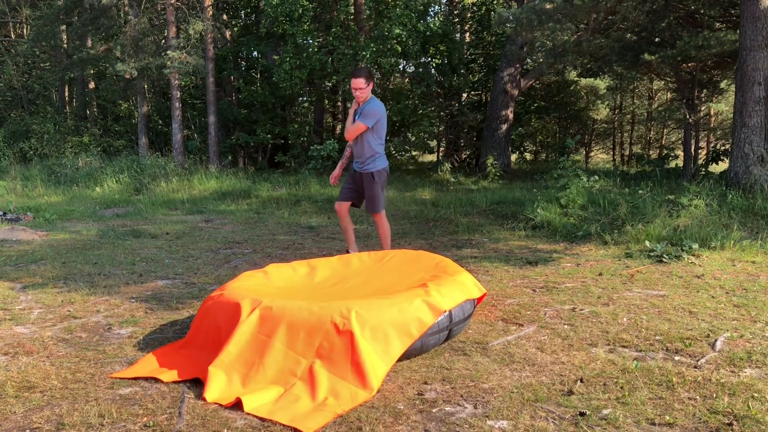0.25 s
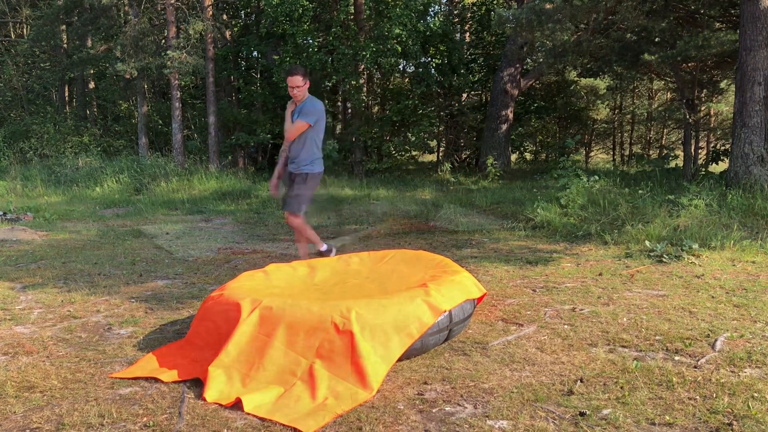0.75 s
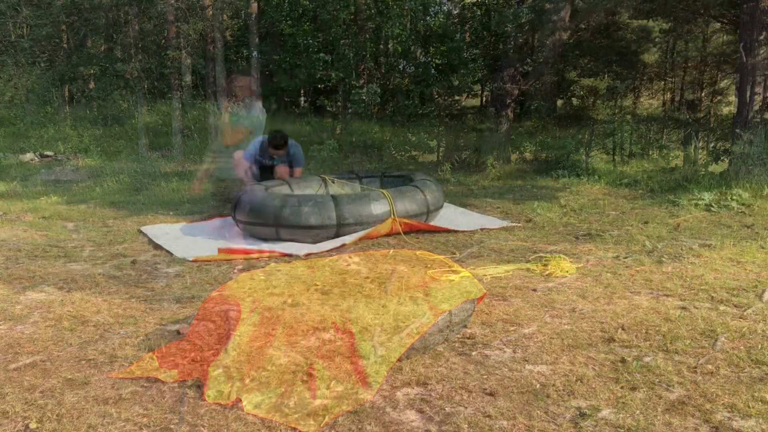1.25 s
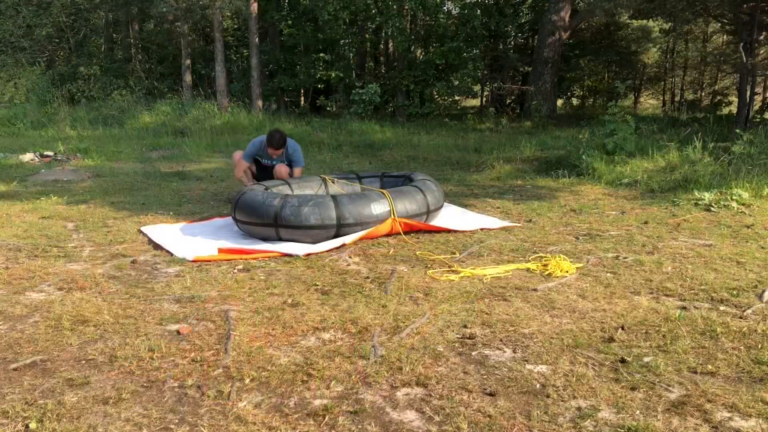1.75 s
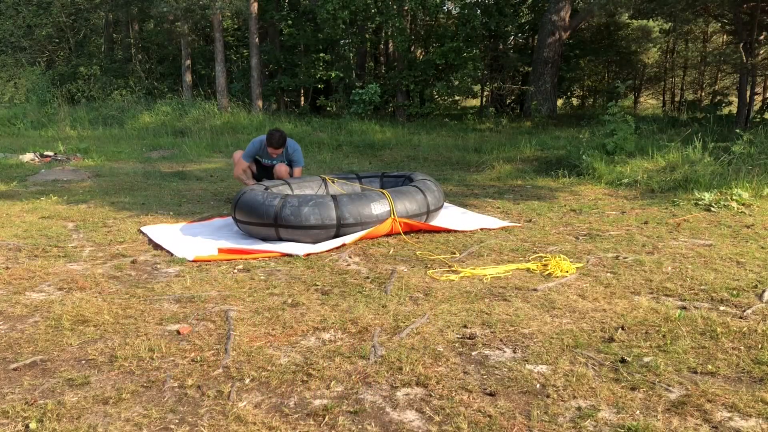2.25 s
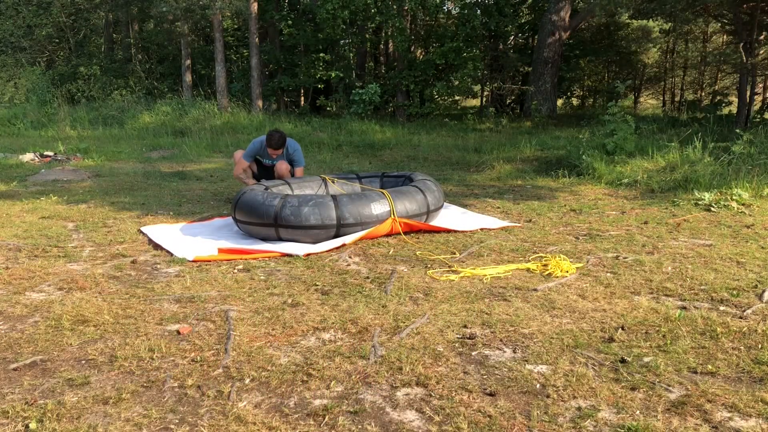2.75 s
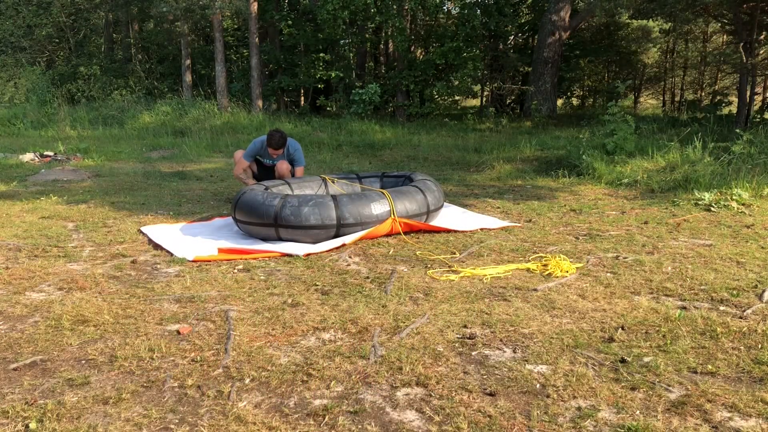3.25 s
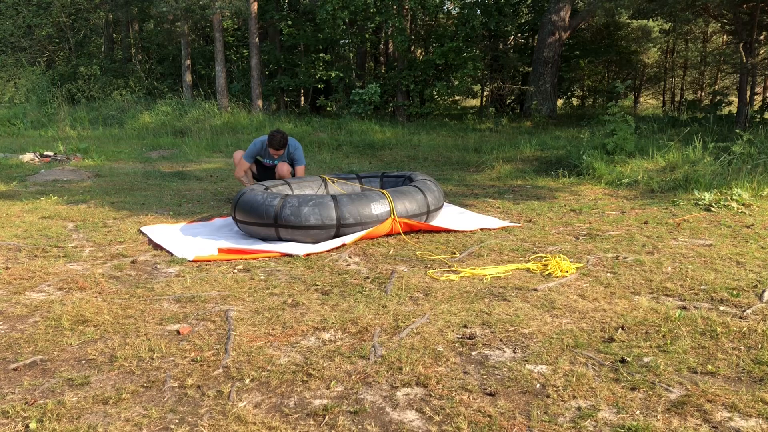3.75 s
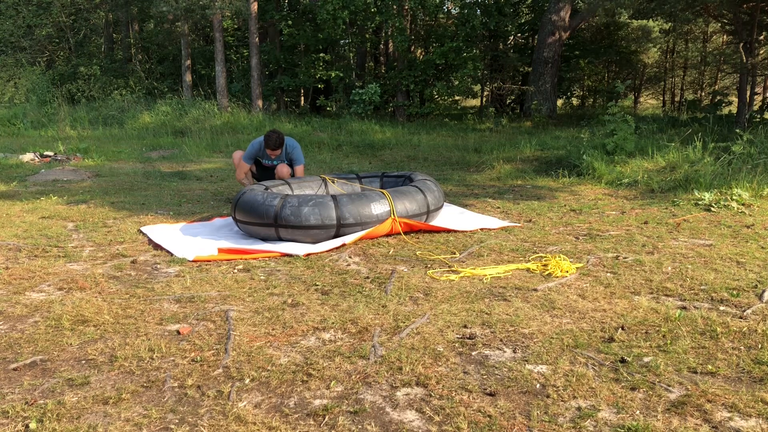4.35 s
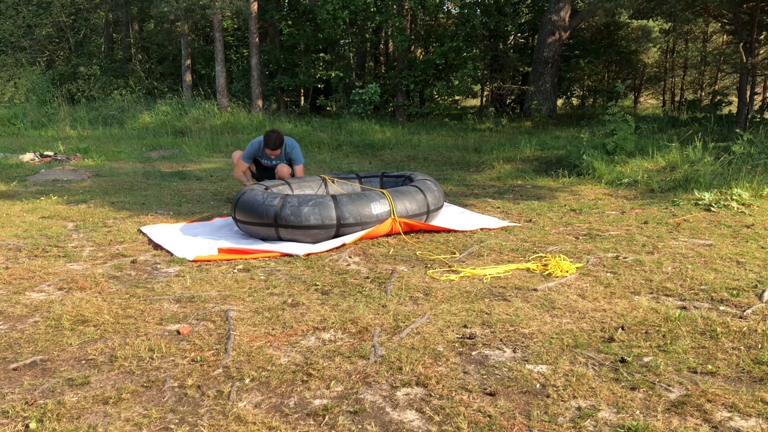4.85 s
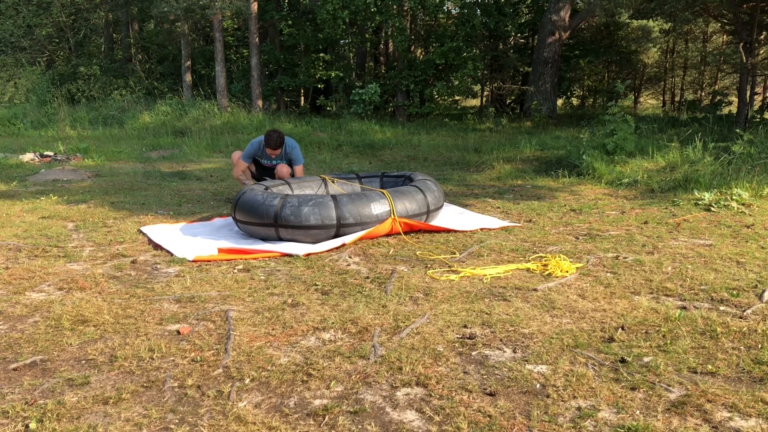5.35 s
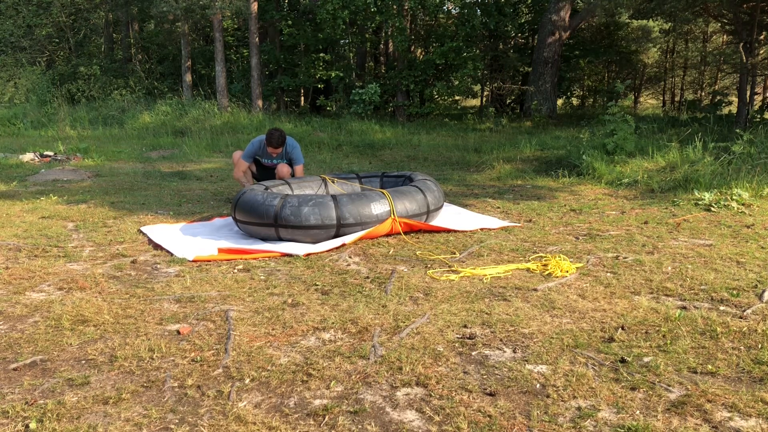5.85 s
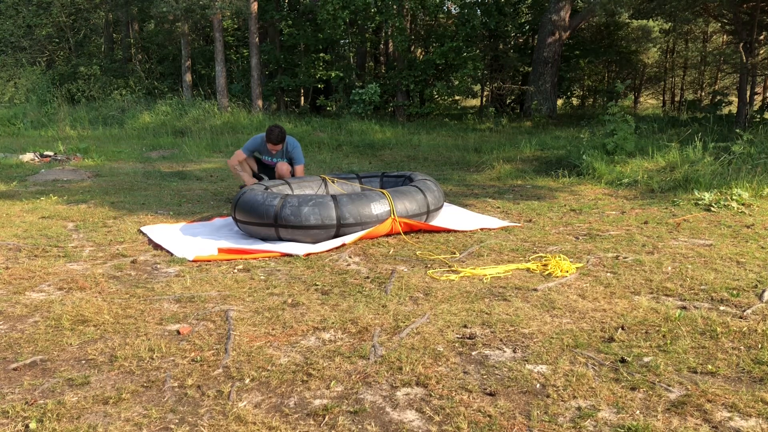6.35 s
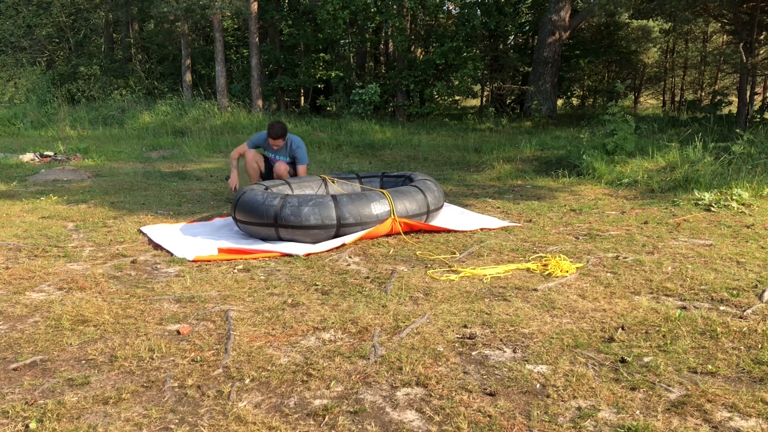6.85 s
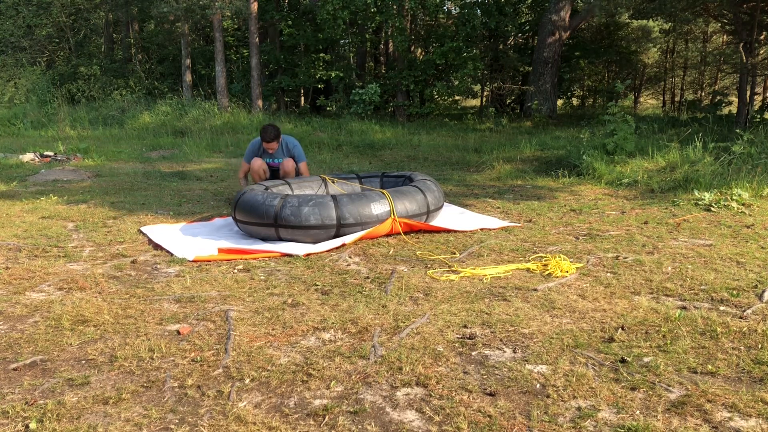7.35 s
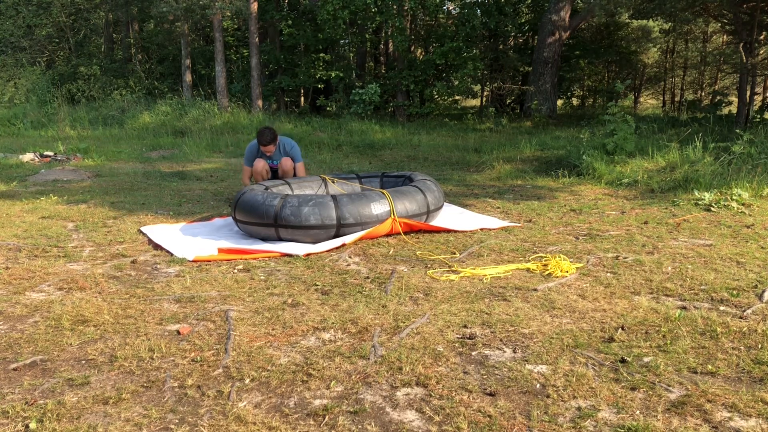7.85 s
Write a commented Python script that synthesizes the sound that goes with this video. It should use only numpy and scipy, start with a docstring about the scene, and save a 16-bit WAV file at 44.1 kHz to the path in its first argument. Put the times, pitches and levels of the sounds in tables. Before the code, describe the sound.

Several metres away in a forest clearing, a hammer strikes a steel punch, setting eyelets into a sheet on the ground. A light tap builds into a run of five blows, then after a pause comes a run of nine. Each is a sharp clank with a dull thud beneath and a short echo from the trees. A faint far rumble, thin insects and microphone hiss lie behind.

```python
"""Setting eyelets in a forest clearing

A hammer sets eyelets into a sheet several metres off: two runs of blows, each opening with a light tap.
Punch and die clank, the ground thuds beneath them, and the trees scatter every blow back.
Behind it: a far rumble and rush, low drones, insects and microphone hiss."""
import sys
import numpy as np
from scipy import signal
from scipy.fft import rfft, irfft
from scipy.io import wavfile
from scipy.ndimage import uniform_filter1d

SR = 44100
rng = np.random.default_rng(int(sys.argv[2]) if len(sys.argv) > 2 else 0)


def output_pcm(signal):
    """Save a mono or channel-first signal as 16-bit PCM at the path in sys.argv[1].

    Samples are clipped to [-1, 1] before scaling.
    """
    pcm = np.clip(np.atleast_2d(signal).T, -1, 1) * 32767
    wavfile.write(sys.argv[1], SR, np.round(pcm).astype(np.int16))


N = 357210
TIME_S = np.arange(N) / SR
BLOW_N = SR // 2
AGE_S = np.arange(BLOW_N) / SR  # time since a blow began


def undb(db):
    """Decibels to gain."""
    return 10 ** (np.asarray(db) / 20)


def unit(x):
    """Scale to rms 1."""
    return x / np.sqrt(np.mean(x ** 2))


def noise(colour, size):
    """Noise of rms 1; colour rows are (frequency [Hz], relative density [dB])."""
    hz, db = np.transpose(colour)
    bins_hz = np.maximum(np.fft.rfftfreq(size, 1 / SR), 1)
    gain = undb(np.interp(np.log(bins_hz), np.log(hz), db))
    return unit(irfft(rfft(rng.standard_normal(size)) * gain, size))


def band(x, lo_hz, hi_hz, order=2):
    """Causal band-pass."""
    return signal.sosfilt(signal.butter(order, [lo_hz, hi_hz], "band", fs=SR, output="sos"), x)


def wander(rate_hz):
    """Smooth random drift of rms 1."""
    hold = int(SR / rate_hz)
    steps = np.repeat(rng.standard_normal(N // hold + 2), hold)
    return unit(uniform_filter1d(steps, hold)[:N])


def ring(hz, t60_s, start_s, size=BLOW_N):
    """Damped mode, struck at start_s."""
    age_s = np.maximum(AGE_S[:size] - start_s, 0)
    return np.cos(2 * np.pi * hz * age_s) * undb(-60 * age_s / t60_s) * (AGE_S[:size] >= start_s)


def hit_gain(x, db):
    """Gain that gives a hit the energy of db rms held for 20 ms."""
    return undb(db) / np.sqrt(np.sum(x ** 2) / (0.02 * SR))


def swell_db(rise_s, start_s=1.06, depth_db=5):
    """Level of a distant sound: starts low, rises once, holds at 0 dB."""
    return -depth_db * np.clip(1 - (TIME_S - start_s) / rise_s, 0, 1)


def distance(rumble_db=-48, rush_db=-49, split_hz=420):
    """Far rumble and a softer rush, each swelling and wavering."""
    # spectrum of the distance: (frequency [Hz], relative density [dB])
    colour = [(15, -36), (25, -35), (50, -3), (69, -0.5), (121, -5.5), (147, -9), (262, -11.5), (299, -17),
              (342, -18), (609, -18.5), (907, -10.5), (1510, -17.5), (1730, -19.5), (2460, -28.5),
              (5000, -39.5), (6500, -31.5), (11000, -120)]
    air = noise(colour, N)
    rumble = unit(band(air, 28, split_hz, order=3))
    rumble *= undb(rumble_db + swell_db(rise_s=1.2) + 1.34 * wander(5))
    rush = unit(band(air, split_hz, 4000, order=3))
    rush *= undb(rush_db + swell_db(rise_s=0.52) + 0.57 * wander(7.2))
    return rumble + rush


def drones(width_hz=8, fade_s=0.031):
    """Narrow, unsteady hums, like engines a long way off."""
    # far hums: (start [s], end [s], centre [Hz], level [dB])
    hums = [(0, 0.54, 82.7, -55), (0.557, 1.213, 80.5, -56.5), (2.23, 3.14, 78.2, -50.5),
            (3.402, 4.405, 132, -55), (5.81, 8.103, 279.5, -65)]
    out = np.zeros(N)
    for start_s, end_s, hz, db in hums:
        gate = np.clip(0.5 + np.minimum(TIME_S - start_s, end_s - TIME_S) / fade_s, 0, 1)
        hum = unit(band(rng.standard_normal(N), hz - width_hz / 2, hz + width_hz / 2))
        out += undb(db) * gate * hum
    return out


def insect_chorus():
    """Thin, far chorus of insects in the grass."""
    # chorus loudness: (time [s], level [dB])
    levels = [(0.3, -73), (1.21, -79), (1.84, -74), (2.52, -84), (5.27, -70), (5.47, -77), (5.79, -76),
              (8.1, -70.5)]
    chorus = unit(band(rng.standard_normal(N), 7250, 8000))
    return chorus * undb(np.interp(TIME_S, *np.transpose(levels)) + 0.5 * wander(9.6))


def insect_trill(db=-60.5, hold_s=0.19, fade_db_per_s=260, stroke_hz=54, stroke_depth=0.31):
    """A nearer insect's short trill at the start, pulsed by its wing strokes."""
    # trill spectrum: (frequency [Hz], relative density [dB])
    colour = [(6000, -36), (7000, -13), (7700, -4), (8300, -5), (9600, -13), (11000, -20), (13000, -45)]
    rate_hz = stroke_hz * (1 + 0.06 * wander(25))
    strokes = 1 + stroke_depth * np.cos(2 * np.pi * np.cumsum(rate_hz) / SR)
    level_db = db - fade_db_per_s * np.maximum(TIME_S - hold_s, 0)
    return unit(noise(colour, N) * strokes) * undb(level_db)


def scatter(x, db, t60_s, start_s, rise_s):
    """Many small reflections: a diffuse answer that swells and dies away."""
    # reflection spectrum: (frequency [Hz], relative density [dB])
    colour = [(100, 5), (300, -1.5), (1000, -2.5), (2500, 0.5), (4500, 2.5), (8000, 2.5), (15000, -4)]
    onset = np.clip((AGE_S - start_s) / rise_s, 0, 1)
    response = noise(colour, BLOW_N) * onset * undb(-60 * AGE_S / t60_s)
    return undb(db) * signal.fftconvolve(x, response / np.linalg.norm(response))[:BLOW_N]


def soil_thud(db, late_s=0.00938):
    """The backing presses into the soil, which answers late with a dull thump."""
    press = ring(265, 0.0091, 0.0011)
    answer = ring(246, 0.052, late_s) + 0.83 * ring(196, 0.047, late_s) + 0.46 * ring(149, 0.14, late_s)
    thump = band(answer - press, 136, 397)
    return thump * hit_gain(thump, db)


def eyelet_tick(db, crush_s=0.0038, fade_s=0.0018, touch_s=0.00022):
    """Steel touches steel, then the eyelet's rim crushes: a few ms of bright crackle."""
    # crackle spectrum: (frequency [Hz], relative density [dB])
    colour = [(300, 6.5), (1000, 5.5), (3000, 3.5), (4700, 1.5), (5600, 0.5), (9000, -2),
              (12000, 0), (15500, 0.5)]
    touch = 1.3 * np.exp(-AGE_S / touch_s)
    crush = np.interp(AGE_S, [0, crush_s], [0.5, 1]) * np.exp(-np.maximum(AGE_S - crush_s, 0) / fade_s)
    crackle = noise(colour, BLOW_N) * (touch + crush)
    return crackle * hit_gain(crackle, db)


def punch(db, favoured_hz, favour_db=10, start_s=0.001078):
    """The steel punch rings thinly; the point of impact favours one mode."""
    # punch modes: (frequency [Hz], t60 [s], relative level [dB])
    modes = [(2510, .09, -5), (3807, .55, -12), (5157, .07, -3), (5911, .18, -14.5), (7105, .03, -3),
             (8722, .2, -20), (9932, .2, -22), (10835, .05, -15), (14822, .06, 1)]
    return sum(undb(db + mode_db + favour_db * (hz == favoured_hz)) * ring(hz, t60_s, start_s)
               for hz, t60_s, mode_db in modes)


def disperse(x, centres_hz=(1300, 2200, 2700, 3100, 3700), width_hz=600):
    """All-passes: partials in bending metal arrive apart, spreading the attack over 1-2 ms."""
    radius = np.exp(-np.pi * width_hz / SR)
    for hz in centres_hz:
        poles = np.array([1, -2 * radius * np.cos(2 * np.pi * hz / SR), radius ** 2])
        x = signal.lfilter(poles[::-1], poles, x)
    return x


def die(knock_db, clank_db, seated, meet_s=0.00031, drive_s=0.0015875, split_hz=1700, size=SR // 10):
    """The punch meets the eyelet, then drives it home; returns the sound ahead and toward the trees."""
    # modes of die and eyelet on their backing: (frequency [Hz], t60 [s], weight ahead [dB],
    # weight toward the trees [dB], weight added when fully seated [dB])
    modes = [(747, 0.017, 8, 10, 5.5), (869, 0.012, 19.5, 11, 0), (1142, 0.015, 7, -3, 5),
             (1300, 0.0084, 10.5, -2, -6), (1393, 0.012, 23, 21, -9), (1827, 0.0087, 24.5, 17, -5),
             (2054, 0.03, 20, 20.5, -14), (2218, 0.034, 5, 0, 15), (2474, 0.031, 8.5, 8.5, 11),
             (2700, 0.027, 18, 5, 3.5), (2797, 0.021, 25, 9, -11), (2944, 0.036, 4, 15.5, -6),
             (3064, 0.01, -0.5, -9, 33.5), (3340, 0.013, -12, -5, 12), (3788, 0.03, 25.5, 19.5, 3),
             (3870, .02, -6, 12, -16), (4255, 0.037, 12, 15, -16), (4560, 0.019, 18, 6, -8)]
    hz, t60_s, ahead_db, aside_db, seated_db = np.transpose(modes)
    detune, uneven_db = rng.standard_normal((2, len(modes)))
    hz = hz * (1 + 0.003 * detune)
    rings = np.array([ring(f, t, drive_s, size) - 0.31 * ring(f, t, meet_s, size)
                      for f, t in zip(hz, t60_s)])
    rings = disperse(band(rings, 665, 3075, order=3))
    rings *= undb(seated * seated_db + uneven_db)[:, None]
    low = hz < split_hz
    ahead, aside = np.zeros((2, BLOW_N))
    for group, db in ((low, knock_db), (~low, clank_db)):  # the backing knocks, the metal clanks
        sound = undb(ahead_db[group]) @ rings[group]
        gain = hit_gain(sound, db)
        ahead[:size] += gain * sound
        aside[:size] += gain * undb(aside_db[group]) @ rings[group]
    return ahead, aside


def hammer(knock_db=-27, clank_db=-28, tick_db=-34.5, thud_db=-33.5, echo_s=0.0087, echo_db=-13):
    """Each blow with one close reflection and the scatter of ground and forest."""
    # hammer blows: (time [s], strength [dB], eyelet seated [0-1], punch ping re strength [dB],
    # favoured punch mode [Hz])
    blows = [(0.7821, -22, 0.45, -43, 3807), (1.0804, -10.5, 0.03, -52, 5157),
             (1.365, -5.5, 0.2, -43, 5911), (1.667, -1, 0, -43.5, 5911), (1.9694, -1, 0, -40.5, 5157),
             (3.6025, -14.5, 0.35, -38, 5157), (3.91, -8.7, .5, -33.5, 2510), (4.2072, -3, 0.32, -62, 5911),
             (4.498, -2, 0.37, -49, 5911), (4.797, -2.1, 0.24, -43.5, 5157),
             (5.0926, -1.7, 0.42, -51, 3807), (5.397, -1.3, 0.4, -57, 3807), (5.6894, -0.5, 1, -46, 3807),
             (5.9752, 0.5, 0.9, -41, 3807)]
    out = np.zeros(N + BLOW_N)
    for time_s, strength_db, seated, ping_db, favoured_hz in blows:
        hard_db = 7 * seated  # a seated eyelet no longer cushions the metal
        ahead, aside = die(knock_db + strength_db, clank_db + strength_db + hard_db, seated)
        tick = eyelet_tick(tick_db + 0.77 * strength_db)
        ping = punch(ping_db + strength_db, favoured_hz)
        thud = soil_thud(thud_db + 0.81 * strength_db)
        all_round = tick + ping + thud
        echo = undb(echo_db) * np.interp(AGE_S - echo_s, AGE_S, ahead, left=0)
        ground = scatter(0.88 * ahead + tick, db=-10, t60_s=0.072, start_s=0.0033, rise_s=0.00074)
        forest = scatter(aside + all_round, db=-11.5, t60_s=0.38, start_s=0.0079, rise_s=0.014)
        start = int(time_s * SR)
        out[start:start + BLOW_N] += ahead + all_round + echo + ground + forest
    return out[:N]


def scene():
    """The clearing, in mono."""
    return (hammer() + distance() + drones() + insect_chorus() + insect_trill())[None]


def record(dry, hiss_db=-61, top_hz=15700):
    """Microphone hiss, then a steep low-pass."""
    # hiss spectrum: (frequency [Hz], relative density [dB])
    colour = [(1500, -5), (4000, -1.5), (6500, -7.5), (8800, -4.5), (10700, -9), (13000, -4.5), (15600, 1)]
    hiss = undb(hiss_db) * noise(colour, N)
    return signal.sosfilt(signal.ellip(10, 0.2, 70, top_hz, fs=SR, output="sos"), dry + hiss)


dry = scene()
out = record(dry)
output_pcm(out)
```